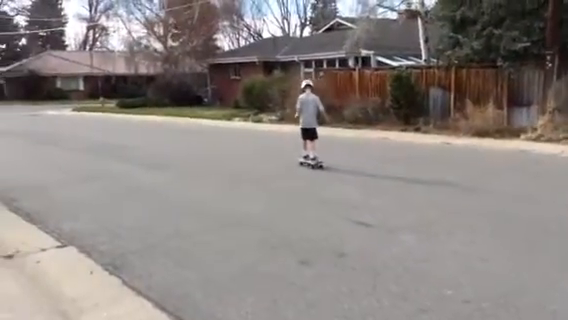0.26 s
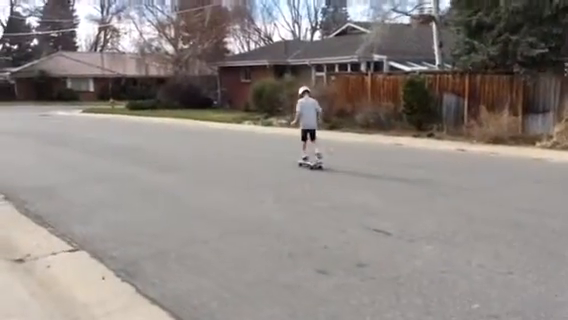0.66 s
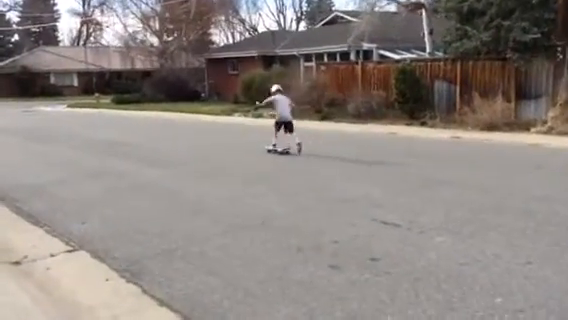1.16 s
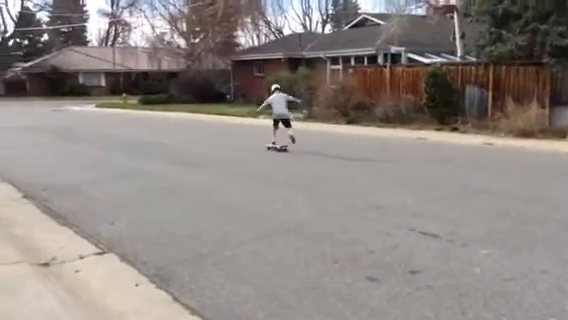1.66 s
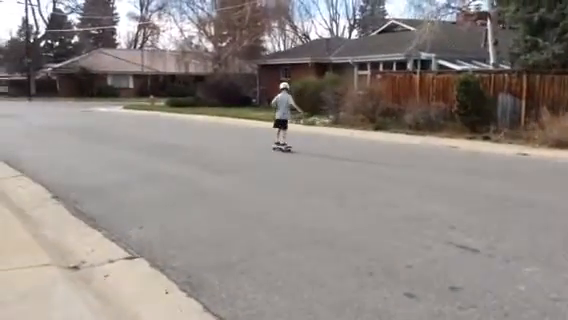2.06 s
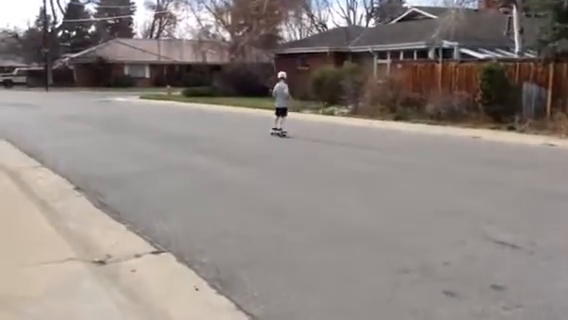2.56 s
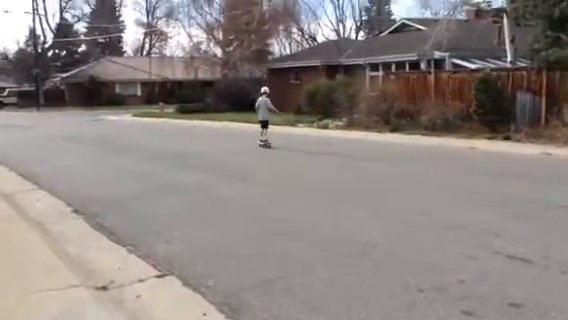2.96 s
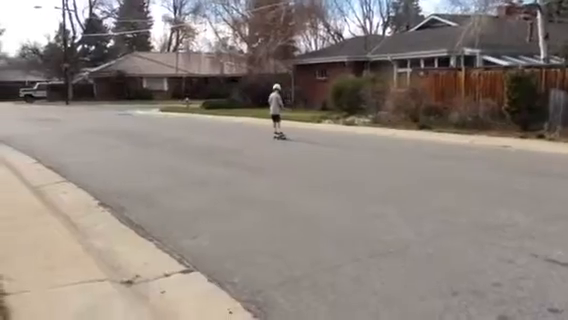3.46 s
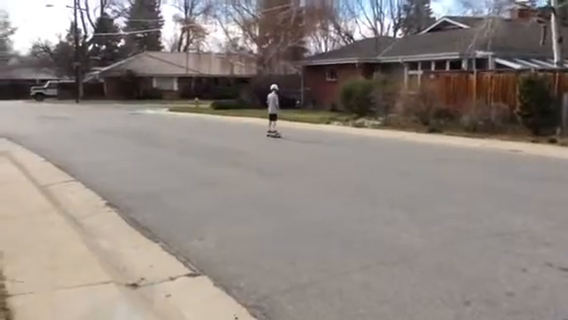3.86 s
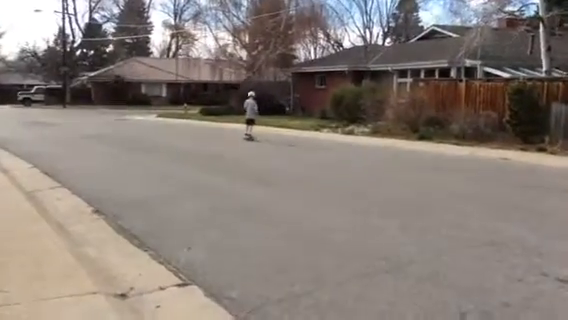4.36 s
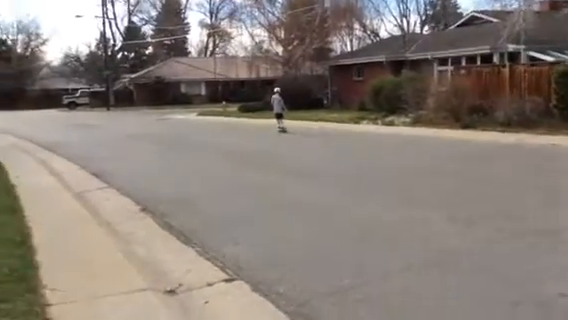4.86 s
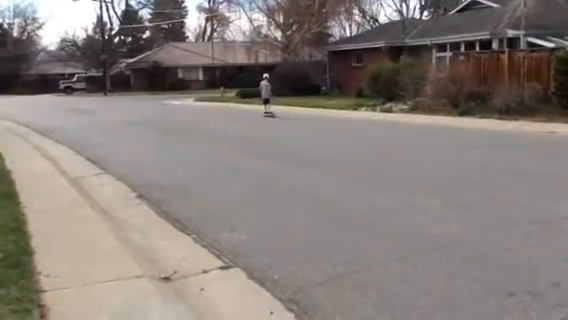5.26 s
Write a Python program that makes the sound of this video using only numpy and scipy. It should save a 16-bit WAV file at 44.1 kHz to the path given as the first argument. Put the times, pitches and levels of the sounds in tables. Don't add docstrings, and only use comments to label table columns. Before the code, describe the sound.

Outdoor hand-held mono pickup: continuous grainy skateboard noise, deck drumming and bright truck chatter with dull echoes from fences and walls. A firm shoe tap comes early, then lighter ones and a brief scuff. Later a hard gritty scrape snaps sharply close by, the rolling carries on with sparser rattles, and a sudden burst of wind buffeting ends it. Distant traffic hum and faint high birds stay very low.

```python
import sys
import numpy as np
from scipy import signal
from scipy.io import wavfile
from scipy.ndimage import uniform_filter1d

SR = 44100
rng = np.random.default_rng(int(sys.argv[2]) if len(sys.argv) > 2 else 0)


def invert_db(x):
    u = np.asarray(x, float) / 20
    return 10 ** u


def bounce(signal):
    frames = np.transpose(np.atleast_2d(signal))
    limited = np.clip(frames, -1, 1)
    pcm = np.round(limited * 32767).astype(np.int16)
    wavfile.write(sys.argv[1], SR, pcm)


N = 242550


def rms_one(x):
    return x / np.sqrt(np.mean(x ** 2) + 1e-20)


def in_time(rows, outside=None):
    s, *columns = np.transpose(rows)
    return [np.interp(np.arange(N) / SR, s, c, outside, outside) for c in columns]


def drift(rate):
    r = np.exp(-80 * np.pi * rate / SR)
    slow = signal.lfilter([1], [1, -2 * r, r * r], rng.standard_normal(N // 40 + 2002))[2000:]
    return np.interp(np.arange(N) / 40, np.arange(len(slow)), rms_one(slow - slow.mean()))


def resonance(x, hz, width):
    r = np.exp(-np.pi * width / SR)
    poles = [1, -2 * r * np.cos(2 * np.pi * hz / SR), r * r]
    return signal.lfilter([(1 - r * r) / 2, 0, (r * r - 1) / 2], poles, x + 1e-18)


def body(x, peaks, sway_db, speed):
    out = 0
    for k, (hz, width, db) in enumerate(peaks):
        mode = resonance(resonance(x, hz, 1.54 * width), hz, 1.55 * width)
        out = out + (-1) ** k * invert_db(db + sway_db * drift(speed)) * rms_one(mode)
    return rms_one(out)


def grains(per_s, spread_db):
    sizes = invert_db(spread_db * np.minimum(rng.exponential(1, N), 5)) * rng.choice([-1, 1], N)
    return sizes * (rng.random(N) < per_s / SR)


def coloured(x, spectrum, patchy_db, speed):
    hz_points, db_points = np.transpose(spectrum)
    count = int(3 * np.log2(hz_points[-1] / hz_points[0]))
    edges = np.geomspace(hz_points[0], min(hz_points[-1], .45 * SR), count)
    out = 0
    for k, (low, high) in enumerate(zip(edges, edges[1:])):
        band_pass = signal.butter(2, [low, high], "band", fs=SR, output="sos")
        band = signal.sosfilt(band_pass, np.roll(x, 977 * (k % 2)))
        band_db = np.interp(np.log(low * high) / 2, np.log(hz_points), db_points)
        out = out + band * invert_db(band_db + patchy_db * drift(speed)[:len(x)])
    return rms_one(out)


def add(track, s, burst):
    i = round(s * SR)
    track[i:i + len(burst)] += burst[:N - i]


def burst(hz, width, rise_s, fall_s):
    t = np.arange(1500) / SR
    x = rng.standard_normal(len(t)) * (1 - np.exp(-t / rise_s)) ** 2 * np.exp(-t / fall_s)
    x = resonance(resonance(x, hz, width), hz, width)
    return x / np.abs(x).max()


def riding(noise, centre_hz, half_width_hz):
    low_pass = signal.butter(2, half_width_hz, fs=SR, output="sos")
    slow = rms_one(signal.sosfilt(low_pass, noise))
    return np.sqrt(2) * slow * np.sin(2 * np.pi * np.cumsum(centre_hz) / SR)


# t/s, firing f/Hz, level/dB
ENGINE = [(0.0, 87, -59.5), (1.28, 81, -61), (1.6, 69, -64), (2.98, 69, -63.5), (3.4, 68, -71),
          (5.1, 71, -59)]
# f/Hz, density level/dB per Hz
LEAF_COLOUR = [(5290, -20), (9000, 2), (10800, 11), (12600, -9), (13600, -4), (15800, -15)]
# t/s, swell level/dB, half length/s
RUSTLES = [(.3, 5, 0.095), (0.998, 9, 0.069), (2.057, 10, 0.037), (3.63, 2, 0.051), (4.4, 2.5, 0.2),
           (4.88, 7, 0.06), (5.45, 20.5, 0.098)]
# start t/s, length/s, first f/Hz, last f/Hz, level/dB
BIRDS = [
    (1.03, .07, 11500, 10500, -82),
    (1.1, 0.077, 10500, 10420, -84),
    (3.21, .17, 8760, 8800, -93),
    (3.41, 0.073, 9100, 8750, -78.5),
    (4.362, .14, 12300, 10900, -89),
    (4.545, .25, 11000, 10500, -89),
]
LEAVES_DB, LEAVES_GROW_DB_PER_S = -86.5, 1.02


def garden():
    t = np.arange(N) / SR
    leaves_db = LEAVES_DB + LEAVES_GROW_DB_PER_S * t
    for s, db, half in RUSTLES:
        leaves_db += db * np.exp(-((t - s) / half) ** 2)
    flutter_db = 1.2 + 0.79 * drift(10.0) + 1.1 * drift(35)
    leaves = coloured(rng.standard_normal(N), LEAF_COLOUR, patchy_db=0.0, speed=18.0)
    out = invert_db(leaves_db + flutter_db) * leaves
    for s, length, first_hz, last_hz, db in BIRDS:
        done = np.clip((t - s) / length, 0, 1)
        hz = first_hz + (last_hz - first_hz) * done + 40 * drift(60)
        swell = np.sqrt(np.abs(np.sin(np.pi * done)))
        out += swell * invert_db(db + 1.0 + 2.5 * drift(40)) * np.sin(2 * np.pi * np.cumsum(hz) / SR)
    hz, db = in_time(ENGINE)
    firing_hz = hz * (1 + 0.0405 * drift(15.7))
    hum = np.sin(2 * np.pi * np.cumsum(firing_hz) / SR)
    return out + 1.15 * invert_db(db + 1.0 + 3.6 * drift(6)) * hum


# t/s, level/dB
AIR = [(0.0, -57), (0.2, -61.5), (1.17, -61.5), (1.54, -60.5), (2.12, -60), (2.4, -60), (3.17, -68),
       (4.29, -72), (4.4, -60), (4.8, -67), (5.07, -55), (5.44, -62)]
# f/Hz, density level/dB per Hz
AIR_COLOUR = [(15, -41), (25, -25), (46, 1.5), (65, -1), (131, -2), (156, -3.5), (251, -10), (314, -15.5),
              (500, -13), (650, -26), (1100, -120)]
# t/s, peak level/dB, f/Hz, length/s
PUFFS = [(0.153, -41.5, 70, 0.024), (1.202, -47, 82, 0.012), (2.231, -48, 78, 0.028),
         (3.14, -38, 87.5, 0.027), (3.449, -39.5, 72, 0.032), (4.404, -45.5, 110, 0.015),
         (5.155, -39.5, 53, 0.021), (5.186, -34, 157, 0.013), (5.228, -36.5, 108, 0.025),
         (5.334, -42.5, 82, 0.0089)]
# t/s, peak level/dB, f/Hz, length/s
LOW_SWINGS = [
    (4.077, -49.5, 200, 0.044),
    (5.455, -30, 54, 0.031),
    (5.479, -7.5, 209, 0.0087),
]
TRAFFIC_DB, TRAFFIC_SWELL_DB, TRAFFIC_SWELL_S, TRAFFIC_RISE_S = -63, 3.5, 2.53, 0.15


def wind():
    air = coloured(rng.standard_normal(N), AIR_COLOUR, patchy_db=2.0, speed=4.9)
    deep = signal.sosfiltfilt(signal.butter(2, 110, fs=SR, output="sos"), air)
    deep_db, = in_time(AIR)
    grown = (1 + np.tanh((np.arange(N) / SR - TRAFFIC_SWELL_S) / TRAFFIC_RISE_S)) / 2
    upper_db = TRAFFIC_DB + TRAFFIC_SWELL_DB * grown
    out = invert_db(deep_db - 4.0) * rms_one(deep) + invert_db(upper_db + 1.5) * rms_one(air - deep)
    for s, db, hz, length in PUFFS + LOW_SWINGS:
        t = np.arange(round(1.41 * max(length, .005) * SR)) / SR
        swing = np.sin(2 * np.pi * hz * t + rng.uniform(0, 8.85))
        add(out, s, invert_db(db) * np.hanning(len(t)) * swing)
    return out


# t/s, buffet level/dB
GUST = [(5.40, -77), (5.44, -53), (5.453, -45.5), (5.462, -42.5), (5.466, -22), (5.479, -19), (5.483, -12),
        (5.49, -11), (5.5, -25.5)]
# f/Hz, density level/dB per Hz
GUST_COLOUR = [(35, -44), (60, -39), (180, -3), (488, 0.5), (1140, -8.5), (1320, -20), (1660, -18.5),
               (2130, -28), (2630, -24), (3000, -47), (3900, -80.5), (6600, -120)]
# f/Hz, density level/dB per Hz
SPRAY_COLOUR = [(1290, -29), (2200, -9), (2980, -12), (4870, 0), (6960, -8), (8450, -5.5), (13000, -32)]
EDGE_PEAK_S, EDGE_DB, EDGE_FLOOR_DB = 5.46, -40, -42.5
EDGE_RISE_DB_PER_S, EDGE_FALL_DB_PER_S = 780, 900
EDGE_HZ, EDGE_TOP_HZ, EDGE_SAG_HZ_PER_S = 9000, 12000, 170000
SPRAY_FULL_S, SPRAY_DB, SPRAY_RISE_DB_PER_S, SPRAY_GROWTH_DB_PER_S = 5.468, -42.5, 810, 114


def gust():
    out, last = np.zeros(N), slice(N - 8000, N)
    t, buffet_db = np.arange(N)[last] / SR, in_time(GUST)[0][last]
    late = t - EDGE_PEAK_S
    rising_db = EDGE_DB + EDGE_RISE_DB_PER_S * late
    falling_db = np.maximum(EDGE_DB - EDGE_FALL_DB_PER_S * late, EDGE_FLOOR_DB)
    hiss_db = np.where(late < 0, rising_db, falling_db)
    centre_hz = np.minimum(EDGE_HZ - EDGE_SAG_HZ_PER_S * late, EDGE_TOP_HZ)
    after = t - SPRAY_FULL_S
    spray_db = SPRAY_DB + np.minimum(SPRAY_RISE_DB_PER_S * after, SPRAY_GROWTH_DB_PER_S * after)
    noise = rng.standard_normal(8000)
    buffet = coloured(noise, GUST_COLOUR, patchy_db=-0.3, speed=25.0)
    buffet = buffet / np.sqrt(uniform_filter1d(buffet ** 2, size=300) + 0.052)
    out[last] = invert_db(buffet_db) * buffet
    out[last] += invert_db(hiss_db) * riding(noise, centre_hz, half_width_hz=960)
    out[last] += invert_db(spray_db) * coloured(noise[::-1], SPRAY_COLOUR, patchy_db=-2.0, speed=24.0)
    return out


# t/s, peak level/dB
TICKS = [(0.3836, -56), (0.4358, -62), (1.276, -64), (1.5554, -58), (1.8494, -69), (2.0124, -60),
         (2.3708, -64), (2.606, -60), (3.6346, -58)]
# t/s, peak level/dB, width/s
SNAP = (4.0736, -21, .0001)


def ticks():
    out, t = np.zeros(N), np.arange(100) / SR
    for s, db in TICKS:
        add(out, s, invert_db(db) * burst(12000, width=7200, rise_s=0.00025, fall_s=0.00097))
    s, db, width = SNAP
    pulse = t / width * np.exp(1 - t / width) * np.cos(np.minimum(t / width, np.pi))
    add(out, s, -invert_db(db) * pulse)
    return out


# t/s, peak level/dB
TAPS = [
    (1.556, -34),
    (2.02, -39.5),
    (2.371, -47),
    (2.476, -54),
    (3.324, -47),
]
# f/Hz, level/dB, decay by 60 dB t60/s
TAP_MODES = [(200, -4.5, 0.033), (316, -20, 0.025), (644, -2.5, 0.028), (945, 5, 0.0064),
             (1370, -3, 0.0075), (2400, -18, 0.017)]


def taps():
    out, t = np.zeros(N), np.arange(2000) / SR
    swell = np.sin(np.pi / 2 * np.minimum(t / 0.0015, 1)) ** 2
    for s, db in TAPS:
        for hz, mode_db, t60 in TAP_MODES:
            decay = invert_db(db + mode_db - 0.5 - 60 * t / t60)
            add(out, s, decay * swell * np.cos(2 * np.pi * hz * (t - .0016)))
    return out


# t/s, pressure as level/dB, sole resonance f/Hz
SCUFFS = [
    [(.19, -85, 2300), (.22, -71, 2300), (.3, -69, 2534), (.36, -75, 2750)],
    [(2.366, -82, 2430), (2.372, -59.5, 2403), (2.39, -56, 2300), (2.41, -55.5, 3500), (2.43, -63.5, 3040),
     (2.447, -67, 2540)],
    [(4.03, -71, 4500), (4.045, -53, 4800), (4.062, -51.5, 4200), (4.074, -40.5, 3410), (4.09, -50, 3010),
     (4.128, -53.5, 2530), (4.14, -64, 2500), (4.22, -78, 2470)],
]
# f/Hz, density level/dB per Hz
SCUFF = [(180, -10), (300, 7), (687, -4), (1020, 5.5), (1630, -7), (3270, -11), (6890, -10), (8400, -5.5),
         (13600, -20.5), (15800, -19)]
# t/s, peak level/dB, f/Hz
CRUNCH = [(2.359, -54, 6000), (2.371, -46.5, 4960), (2.381, -45, 2200), (2.4114, -55, 3100),
          (4.0441, -32.5, 4900), (4.0494, -44, 5220), (4.056, -36, 8100), (4.062, -30, 3780),
          (4.0724, -25, 3520), (4.0779, -30, 3030), (4.081, -27, 4500), (4.095, -33, 3170),
          (4.1098, -39, 3830), (4.1264, -36, 2870)]


def shoe():
    out = np.zeros(N)
    high_pass = signal.butter(2, 6500, "high", fs=SR, output="sos")
    for rows in SCUFFS:
        span = slice(round(rows[0][0] * SR), round(rows[-1][0] * SR))
        level_db, sole_hz = [c[span] for c in in_time(rows)]
        grit = grains(7000 * invert_db(5.0 * drift(140)), spread_db=2.5)[span]
        drag = coloured(grit, SCUFF, patchy_db=3.5, speed=85.0)
        bright = signal.sosfilt(high_pass, drag)
        sole = invert_db(1.5) * riding(grit, sole_hz, half_width_hz=1070)
        out[span] += invert_db(level_db - 1.0) * (drag - bright + bright * invert_db(3.5) + sole)
    for s, db, hz in CRUNCH:
        add(out, s, invert_db(db - 3.5) * burst(hz, width=3200, rise_s=0.00027, fall_s=0.0015))
        shards = burst(10600, width=2700, rise_s=.0003, fall_s=0.0016)
        add(out, s, invert_db(db - 16.0) * shards)
    return out


# delay t/s, level/dB
ECHOES = [
    (.011, -18),
    (0.033, -6.5),
    (.071, -17),
]


def street(x):
    dull = signal.lfilter([.45], [1, -.55], x)
    return x + sum(invert_db(db) * np.roll(dull, round(s * SR)) for s, db in ECHOES)


# t/s, asphalt coarseness as grind level/dB, rider's weight on the nose as ring over drum level/dB
ROLL = [(0.0, -73.5, -2.5), (0.25, -65.5, -10.5), (0.45, -74.5, -8), (0.65, -70.5, -10), (0.86, -65, -1),
        (1.04, -65.5, -2.5), (1.21, -69, -2.5), (1.45, -66.5, -21), (1.8, -64, -2), (2.15, -63.5, -8),
        (2.41, -71, -7), (2.68, -64, -0.5), (3.2, -68.5, 1.5), (3.47, -68.5, 5), (3.65, -64, 0.5),
        (4.09, -66.5, -7), (4.58, -69, 4.5), (5.2, -67, -0.5)]
MEAN_GRIND_DB = -67.5
HISS_DB, HISS_FOLLOWS = -74.5, 1.05


def grit_db():
    return HISS_DB + HISS_FOLLOWS * (in_time(ROLL)[0] - MEAN_GRIND_DB)


# t/s, peak level/dB, centre f/Hz
RATTLE = [(0.076, -54, 6300), (0.1406, -57, 6100), (0.2116, -50.5, 5960), (0.852, -50.5, 6460),
          (0.8674, -49, 7300), (0.9303, -49.5, 6620), (0.9733, -53, 6400), (1.0273, -52.5, 6460),
          (1.072, -53, 6650), (1.193, -52, 6400), (1.2093, -52, 6530), (1.377, -50.5, 7000),
          (1.397, -54, 6560), (1.6035, -52, 6700), (1.6366, -51, 6200), (1.65, -52, 6860),
          (1.6851, -44.5, 6570), (1.7656, -51, 6360), (1.8462, -47.5, 7240), (1.863, -47, 6550),
          (2.061, -52, 7150), (2.4768, -53, 6550), (2.6639, -54, 6600), (2.7213, -50, 7080),
          (3.656, -57, 7000), (4.224, -53, 6860), (4.351, -55, 7500), (4.3679, -53, 6950),
          (4.85, -53, 5960)]
WHEEL_TURN_S, TURN_JITTER_S = 0.038, 0.009
TURN_DB, TURN_SPREAD_DB, TURN_FADE_DB_PER_S, TURN_FOLLOWS = -55.5, 2.5, 2.0, 0.58
WASHER_HZ, WASHER_SPREAD_HZ = 6380, 760


def trucks():
    out, chance = np.zeros(N), rng.standard_normal((150, 3))
    turn_s = np.abs(WHEEL_TURN_S * np.arange(len(chance)) + TURN_JITTER_S * chance[:, 0])
    coarse_db = np.interp(turn_s, *np.transpose(ROLL)[:2]) - MEAN_GRIND_DB
    turn_db = TURN_DB - TURN_FADE_DB_PER_S * turn_s + TURN_FOLLOWS * coarse_db
    turn_db = turn_db + TURN_SPREAD_DB * chance[:, 1]
    turn_hz = WASHER_HZ + WASHER_SPREAD_HZ * chance[:, 2]
    for s, db, hz in RATTLE + list(zip(turn_s, turn_db, turn_hz)):
        clump = burst(hz, width=2250, rise_s=0.00055, fall_s=0.002)
        add(out, min(s, (N - 1) / SR), invert_db(db - 3.5) * clump)
    small = grains(900 * invert_db(4.3 * drift(17)), spread_db=4.5)
    chatter = rms_one(resonance(small, 6120, 830) - resonance(small, 7700, 1200))
    return out + invert_db(grit_db() - 5.5) * chatter


# f/Hz, width/Hz, level/dB
DRUM = [(240, 69, 6.5), (529, 73, 3), (631, 112, 8), (815, 397, 5.5)]
# f/Hz, width/Hz, level/dB
RING = [(960, 100, 0), (1183, 146, 9)]
# f/Hz, width/Hz, level/dB
GRIND = [(1560, 380, 1), (1960, 200, 3.5), (2300, 160, 0), (2512, 90, -4.5), (2885, 570, -0.5),
         (3324, 92, -3.5), (3650, 450, 0), (4670, 1400, -13)]
# f/Hz, density level/dB per Hz
GRIT = [(2350, -45), (4000, 7), (4430, 0.5), (4780, -4.5), (5380, -4.5), (6990, -4.5), (11000, -11.5),
        (14300, -54), (22000, -120)]
# t/s, peak level/dB, f/Hz
KNOCKS = [(0.2545, -50.5, 2310), (0.2874, -48.5, 2300), (0.3094, -51, 2830), (0.9842, -55, 2280),
          (0.997, -46, 2330), (1.0103, -50, 2880), (1.1956, -49.5, 2190), (1.5743, -43, 2050),
          (1.64, -49, 1930), (1.6846, -46, 1960), (2.727, -48, 1930), (2.7635, -51, 1990),
          (2.9397, -49, 2100), (2.993, -49, 2050), (3.629, -50.5, 3250), (4.224, -52, 2330),
          (4.6032, -54, 2580)]
DRUM_DB, DRUM_FOLLOWS, NOSE_DAMPS_DRUM = -63.5, 0.75, 0.12


def wheels():
    grind_db, nose_db = in_time(ROLL)
    drum_db = DRUM_DB + DRUM_FOLLOWS * (grind_db - MEAN_GRIND_DB) - NOSE_DAMPS_DRUM * nose_db
    bumps = drift(18)
    stones = grains(5000 * invert_db(1.5 * bumps), spread_db=4.5)
    deck = invert_db(drum_db + 2.0) * body(stones, DRUM, sway_db=2.5, speed=11.0)
    other_stones = np.roll(stones, 4410)
    deck += invert_db(drum_db + nose_db - 2.5) * body(other_stones, RING, sway_db=2.5, speed=14.0)
    grind = invert_db(grind_db - 2.5) * body(stones, GRIND, sway_db=2.0, speed=13.0)
    for s, db, hz in KNOCKS:
        add(grind, s, invert_db(db - 5.5) * burst(hz, width=750, rise_s=0.00033, fall_s=0.0094))
    grit = grains(9000 * invert_db(4.5 * drift(37)), spread_db=1.5)
    hiss = coloured(grit, GRIT, patchy_db=0.5, speed=53.0)
    return deck + grind + invert_db(grit_db() - 3.0 + 1.84 * bumps) * hiss


def scene():
    background = garden() + wind() + gust()
    board = taps() + shoe() + ticks() + street(trucks()) + wheels()
    return (background + board)[None]


def band_limit(x):
    return signal.sosfilt(signal.butter(12, 15930, fs=SR, output="sos"), x)


def record(dry):
    rounded = .8 * np.tanh(dry / .8)
    low_pass = signal.ellip(10, .5, 70, 15900, fs=SR, output="sos")
    mix = signal.sosfilt(low_pass, rounded)
    return band_limit(mix)


dry = scene()
out = record(dry)
bounce(out)
```